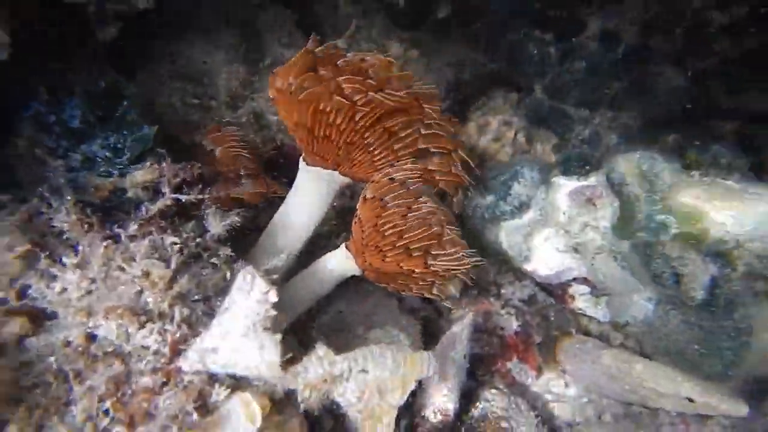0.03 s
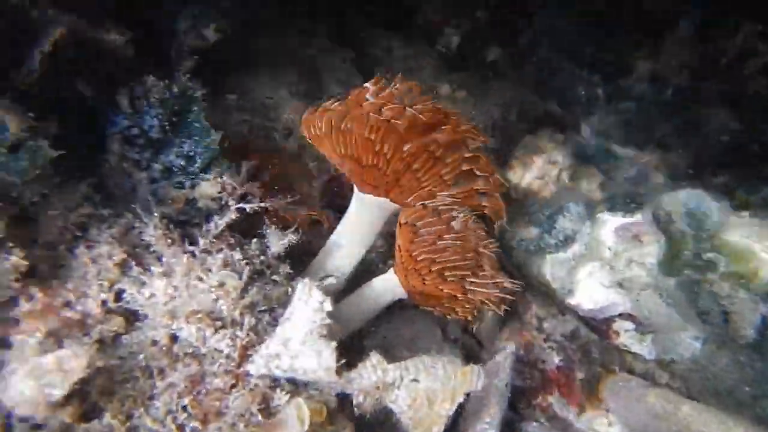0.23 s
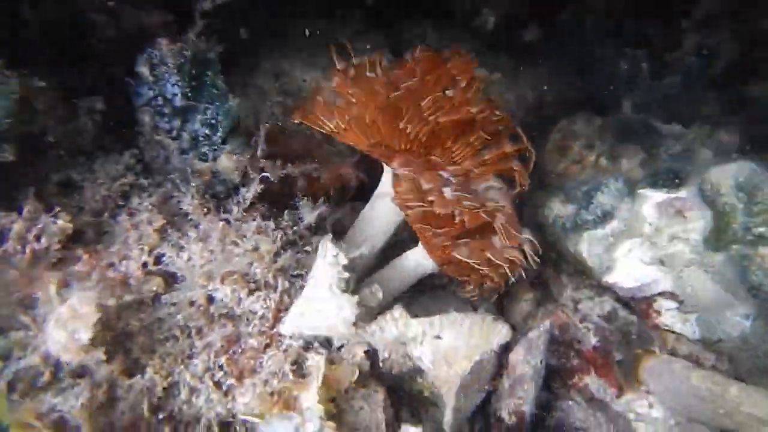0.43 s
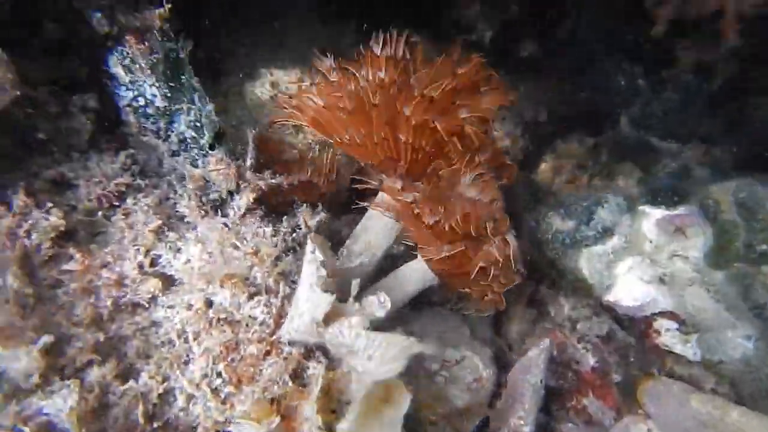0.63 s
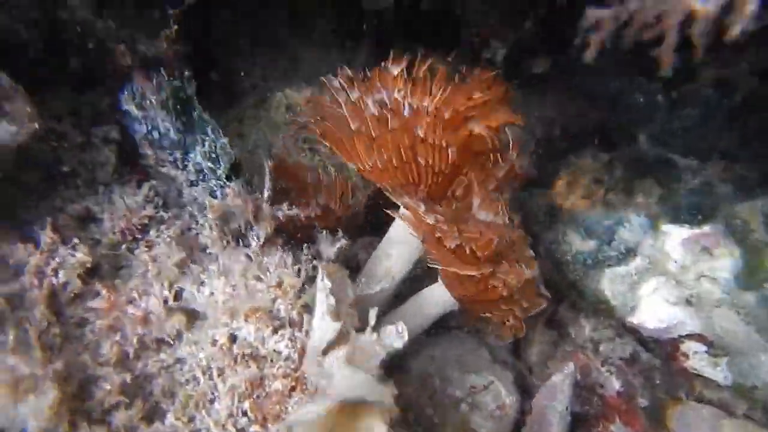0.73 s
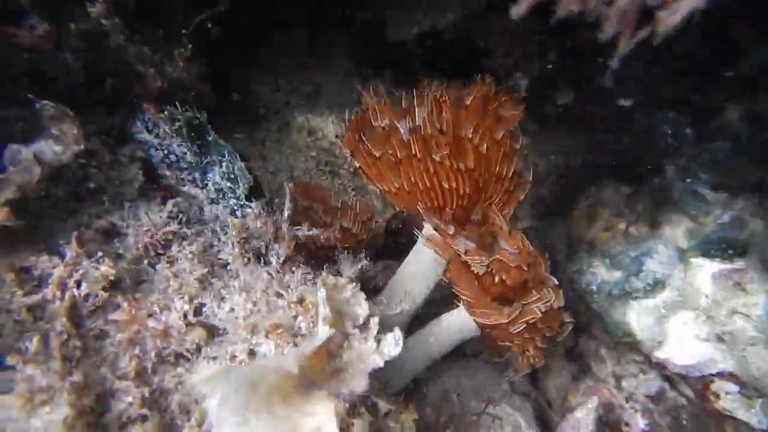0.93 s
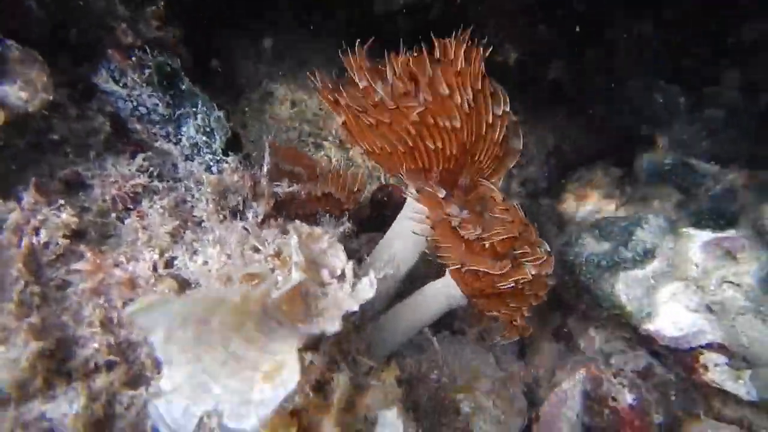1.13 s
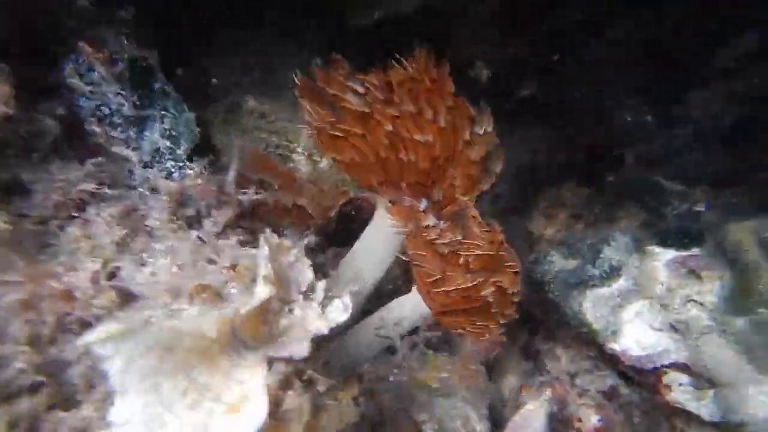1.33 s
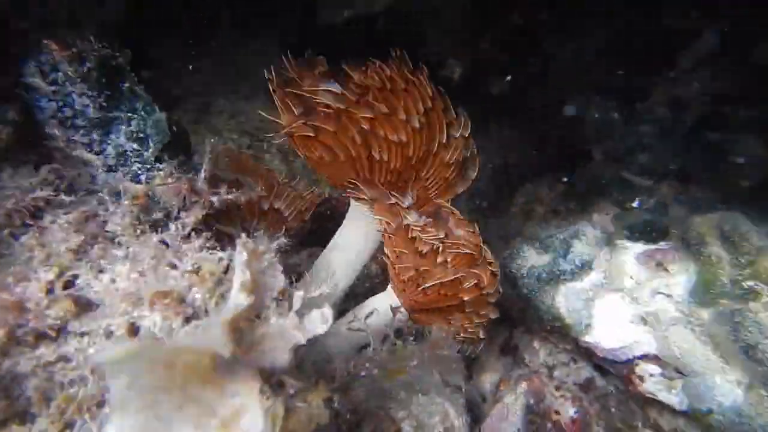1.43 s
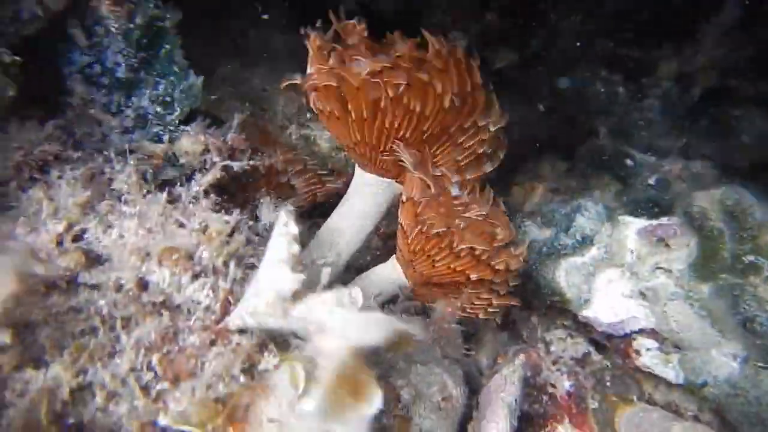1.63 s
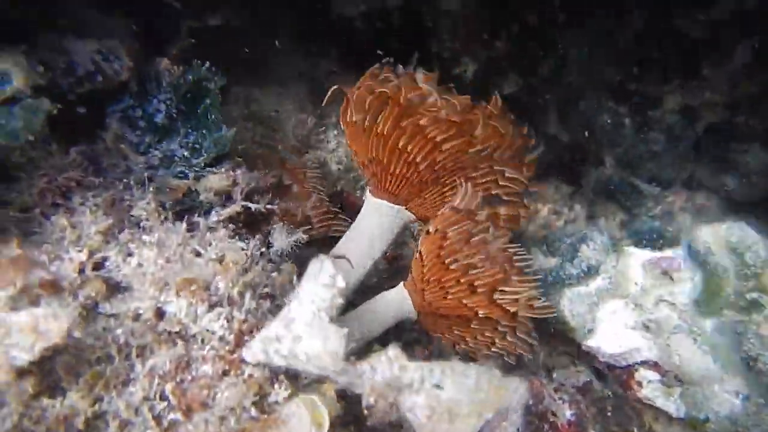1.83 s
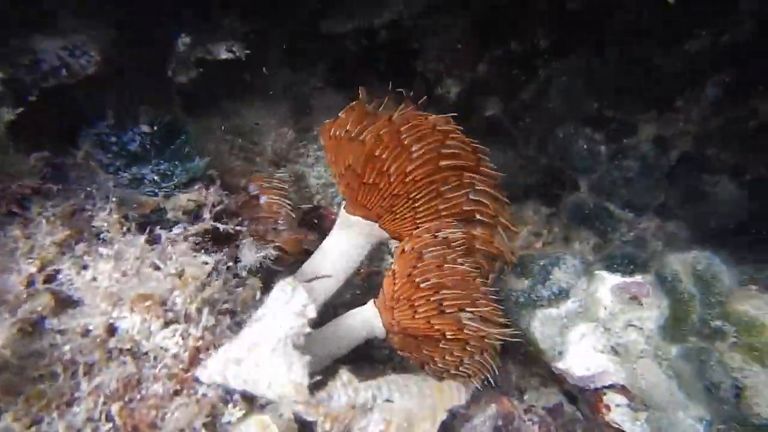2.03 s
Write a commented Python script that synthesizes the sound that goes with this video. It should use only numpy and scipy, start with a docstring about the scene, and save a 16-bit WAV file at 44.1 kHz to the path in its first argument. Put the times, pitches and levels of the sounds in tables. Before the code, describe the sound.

Water surging and gurgling underwater, with scattered sharp knocks and clicks.

```python
"""Underwater among rocks, inside a sealed camera housing. Surging water and countless tiny impacts
shake the housing, which booms near 350 Hz and rings near 1-1.5 kHz under a fizz and a fine hiss.
Slugs of water thump it in low gulps; sharp knocks and thin snaps stand out. Faint, brief tones at
multiples of 1 kHz are heard just after the loudest snaps. After the loudest knocks the rush drops
at once and creeps back."""
import sys
import numpy as np
from scipy import signal
from scipy.fft import rfft, irfft, next_fast_len
from scipy.io import wavfile
from scipy.ndimage import uniform_filter1d, map_coordinates

SR = 44100
rng = np.random.default_rng(int(sys.argv[2]) if len(sys.argv) > 2 else 0)


def log_audio(samples):
    """Write samples as a 16-bit WAV file to the path given in sys.argv[1]."""
    # one column per channel
    frames = np.atleast_2d(samples).T
    # limit to full scale, then quantise
    limited = np.clip(frames, -1, 1)
    pcm = np.round(limited * 32767).astype(np.int16)
    wavfile.write(sys.argv[1], SR, pcm)


N = 92610

# Port likeness: f/Hz, left-right correlation
PORT_LIKENESS = [(40, 0.28), (75, 0.24), (110, 0.75), (170, 0.9), (340, 1), (520, 0.31), (700, 0.092),
                 (1100, 0.37), (1500, 0.75), (2300, 0.9), (3200, 0.99), (4000, 0.25), (6200, 0.25),
                 (10000, 0.12)]
# Port phase: f/Hz, left lag/rad
PORT_LAG_RAD = [(1000, 0), (1600, 1), (2000, 1.48), (3000, 2), (3800, 1.5), (5500, 0.5), (16000, -3.5)]
# Port balance: f/Hz, left minus right/dB
PORT_PAN_DB = [(60, -6), (120, -1), (240, -0.5), (480, -2), (950, 3), (1890, 6.5), (3770, 3.5), (7520, 0),
               (15000, 1)]
# Hiss envelope: t/s, level/dB
HISS_LEVEL_DB = [(0, -78), (.4, -75), (.95, -69), (1.005, -81), (1.65, -71), (1.7, -86), (1.78, -91),
                 (2.1, -90)]
# Hiss spectrum: f/Hz, gain/dB
HISS_EQ = [(3500, -10), (5000, 8), (6500, 8), (9000, 1), (15600, -3), (15900, -25)]
# Surge envelopes: t/s, boom level/dB, ring level/dB, fizz level/dB
SURGE_LEVELS_DB = [(0, -38.5, -34.5, -58.5), (.2, -30.5, -32, -60), (.33, -27, -29.5, -57),
                   (0.411, -23.5, -22.5, -49.5), (0.468, -18.5, -23, -51), (.5, -26, -25, -50),
                   (0.699, -25, -25.5, -52.5), (0.902, -18, -18.5, -45), (0.944, -21.5, -25, -46.5),
                   (0.991, -28.5, -11.5, -47), (1.005, -35, -28, -54.5), (1.08, -29.5, -33, -61.5),
                   (1.2, -29, -32.5, -56.5), (1.33, -21.5, -29.5, -55), (1.521, -22.5, -27, -52.5),
                   (1.632, -20, -21.5, -48), (1.689, -33, -22, -52), (1.698, -38.5, -43.5, -52.5),
                   (1.738, -34, -26, -66), (1.762, -25, -20.5, -56), (1.783, -43, -51, -83),
                   (1.9, -47, -49.5, -75), (2.1, -44, -46, -75.5)]
# Housing responses, low to high: f/Hz, gain/dB
RUMBLE_EQ = [(15, -24), (40, 1), (80, 0), (130, 0), (200, -5.5), (300, -49), (900, -120)]
BOOM_EQ = [(100, -43.5), (160, -16.5), (200, -9), (270, -4.5), (330, 2), (400, 0), (470, -7.5),
           (560, -29.5), (800, -63.5), (2000, -120)]
RING_EQ = [(300, -20.5), (550, -7.5), (800, -5.5), (1000, 1), (1150, -8), (1400, -3.5), (1700, -15.5),
           (2100, -21), (2350, -25.5), (2500, -34.5), (2700, -66), (4000, -120)]
FIZZ_EQ = [(2300, -54.5), (2600, -6), (2900, 5.5), (3150, -1), (3450, -3.5), (4000, -16), (5000, -19),
           (6300, -18.5), (7000, -30), (8300, -27), (9500, -33), (16000, -61)]
# Spectra of faint snaps, loud snaps and knock cracks: f/Hz, gain/dB
TICK_EQ = [(3000, -33), (9000, -14.5), (15600, -13), (16000, -39)]
SNAP_EQ = [(2500, -23.5), (3800, -0.5), (6000, -4.5), (8000, -7.5), (11000, -17.5), (16500, -26.5)]
CRACK_EQ = [(1500, -15), (2100, 21.5), (2500, 4), (3200, 11.5), (3800, -0.5), (4500, -17), (7000, -60)]
# Faint, brief tones: t/s, level/dB
FAINT_TONE_EVENTS = [(.99, -55), (1.686, -56), (1.758, -55.5)]
# Their pitches: multiple of 1 kHz -> gain/dB
FAINT_TONE_GAINS_DB = {5: -8, 6: -1, 7: -1, 8: -4, 9: -8, 11: -18}
# Snaps: t/s, strength/dB, left minus right/dB
SNAP_EVENTS = [(0.2298, -43, 0), (.337, -42, -1.5), (0.423, -40.5, 2.5), (0.5222, -41.5, 0),
               (0.587, -42, -5), (.742, -44, 3), (.898, -33, -9), (0.9306, -23, 2), (0.988, -22.5, -6),
               (0.99, -21, 1.5), (1.138, -44.5, -2), (1.1875, -47.5, -1.5), (1.283, -48, 10.5),
               (1.372, -45.5, -0.5), (1.5, -48, 4.5), (1.5444, -47.5, -1.5), (1.6082, -37.5, 3),
               (1.6532, -29, 0.5), (1.6818, -18, 4), (1.6847, -22, 8), (1.7469, -22, -1),
               (1.7558, -15.5, 2), (1.758, -22, 2)]
# Water slugs: t/s, level/dB, f/Hz, t60/s
GULP_EVENTS = [(0.226, -18.5, 402, 0.054), (0.234, -26, 107, 0.03), (0.292, -21.5, 404, 0.04),
               (0.334, -18, 331, 0.11), (0.367, -4.5, 360, 0.028), (0.383, -5.5, 466, 0.0082),
               (0.398, -13, 340, 0.012), (.411, -12, 342, 0.045), (.436, -13.5, 342, 0.038),
               (.457, -2.5, 395, 0.04), (0.554, -12, 358, 0.031), (0.643, -10, 427, 0.014),
               (0.698, -16, 365, 0.023), (.814, -15.5, 333, 0.035), (0.915, -13.5, 398, 0.025),
               (1.181, -20, 314, 0.065), (1.485, -14.5, 319, 0.082), (1.626, -19.5, 340, 0.067),
               (1.753, -26, 130, 0.017), (1.853, -32.5, 413, 0.11)]
# Knocks: t/s, ping strength/dB, f/Hz, t60/s, crack strength/dB, left minus right/dB
KNOCK_EVENTS = [(.336, -15.5, 1060, 0.015, -51, 8), (0.399, -11, 1539, 0.04, -56, 7),
                (0.424, -11.5, 1116, 0.052, -49, 1), (0.433, -11.5, 1490, 0.031, -58, 5.5),
                (0.472, -10.5, 982, 0.042, -51.5, 14), (.551, -14.5, 1000, .02, -51, 6),
                (0.586, -7, 956, 0.017, -24.5, 7.5), (0.781, -17.5, 1136, 0.037, -52, -2),
                (0.871, -23.5, 960, 0.012, -39, -12), (0.898, -24.5, 1226, .02, -21, 5),
                (0.916, -5.5, 1010, 0.014, -43.5, -1), (.929, -2, 920, 0.012, -22, 3),
                (0.937, -17.5, 1140, 0.022, -54, 13), (0.966, -10, 960, 0.052, -43.5, -3),
                (0.984, -10, 1095, 0.018, -40, -13.5), (0.987, -3.5, 1390, 0.028, -13.5, 5.5),
                (0.9986, -6, 1334, 0.025, -14.5, 3), (1.0623, -13, 1380, 0.017, -47, 1),
                (1.062, -11, 728, 0.047, -65, 2), (1.187, -28, 1250, 0.027, -32, 17.5),
                (1.412, -24, 1560, 0.017, -45, 1), (0.977, -12, 1020, 0.021, -45, -3),
                (1.265, -16, 1054, 0.028, -58, 0), (1.373, -18, 1000, 0.018, -26.5, 2.5),
                (1.574, -5, 1183, 0.02, -26.5, 1.5), (1.597, -11.5, 1020, 0.035, -50, -2.5),
                (1.607, -5.5, 1250, 0.026, -46.5, -2.5), (1.616, -23, 1270, 0.024, -58, -5),
                (1.6519, -2, 1030, 0.018, -16, -1), (1.668, -17.5, 1100, .03, -46.5, -13),
                (1.673, -7.5, 1020, 0.031, -29, -3), (1.682, -4.5, 965, 0.013, -11.5, 1),
                (1.684, -3.5, 1316, 0.019, -15, 4), (1.698, -13, 1370, 0.026, -60, 3),
                (1.7463, -4, 1385, 0.019, -20, 0), (1.7556, -2.5, 1353, 0.0091, -13, 9.5),
                (1.7556, -4.5, 1056, 0.032, -19.5, -0.5), (1.785, -30, 1100, 0.033, -76, -1),
                (1.885, -36.5, 1543, 0.038, -48, 4.5)]

SIDES = np.array([[.5], [-.5]])  # splits a left-right difference
TIME_S = np.arange(N) / SR


def amp(db):
    """dB to amplitude."""
    return 10 ** (np.asarray(db) / 20)


def unit_rms(x):
    """Scale to RMS 1."""
    return x / np.sqrt(np.mean(x ** 2) + 1e-20)


def curve_at(points, hz):
    """Interpolate on a log frequency axis."""
    f, values = np.transpose(points)
    return np.interp(np.log(hz + 1), np.log(f + 1), values)


def wobble(knots_per_s):
    """Smooth random curve."""
    knots = rng.standard_normal(int(N * knots_per_s / SR) + 4)
    return map_coordinates(knots, [TIME_S * knots_per_s])


def filtered(x, response):
    """Apply a complex response(hz)."""
    size = 2 * next_fast_len(N // 2 + SR // 4)
    return irfft(rfft(x, size) * response(np.fft.rfftfreq(size, 1 / SR)), size)[..., :N]


def resonate(x, eq):
    """Minimum-phase filter: rings only after its cause."""
    def response(hz):
        cepstrum = irfft(np.log(amp(curve_at(eq, hz))))
        half = len(cepstrum) // 2
        cepstrum[1:half] *= 2
        cepstrum[half + 1:] = 0
        return np.exp(rfft(cepstrum))
    return filtered(x, response)


def ports(pair):
    """Mix two signals to left and right: partly alike, offset in level and phase."""
    def mid_side(hz):
        angle = np.arccos(np.clip(curve_at(PORT_LIKENESS, hz), 0, 1)) / 2
        return np.array([np.cos(angle), np.sin(angle)])

    def offset(hz):
        return amp(SIDES * curve_at(PORT_PAN_DB, hz)) * np.exp(-1j * SIDES * curve_at(PORT_LAG_RAD, hz))
    mid, side = filtered(pair, mid_side)
    return filtered(np.array([mid + side, mid - side]), offset)


def ping(t, hz, t60_s, rise_s, phase_rad, decay_power=1):
    """Damped mode, peak near 1; decay_power above 1 ends it more abruptly."""
    envelope = amp(-60 * (t / t60_s) ** decay_power) * (1 - np.exp(-t / rise_s)) ** 2
    return envelope / envelope.max() * np.sin(2 * np.pi * hz * t + phase_rad)


def burst(t, t60_s, width):
    """Decaying stereo noise of set energy."""
    noise = rng.standard_normal(len(t)) + width * rng.standard_normal((2, len(t)))
    x = amp(-60 * t / t60_s) * noise
    return 4 * x / np.linalg.norm(x, axis=1, keepdims=True)


def hiss():
    """Fine, smooth hiss that creeps up and drops back."""
    noise = filtered(rng.standard_normal((2, N)), lambda hz: amp(curve_at(HISS_EQ, hz)))
    return amp(np.interp(TIME_S, *np.transpose(HISS_LEVEL_DB))) * unit_rms(noise)


def churn(impacts, impact_share, lump_db, lumps_per_s, patch_db):
    """Churning water: noise plus impacts, swelling in quick lumps and small patches of pitch."""
    mix = np.sqrt(1 - impact_share) * rng.standard_normal((2, N)) + np.sqrt(impact_share) * impacts
    spectra = signal.stft(mix * amp(lump_db * wobble(lumps_per_s)), nperseg=256)[2]
    patches = uniform_filter1d(rng.standard_normal(spectra.shape[1:]), size=4, axis=0)
    patches = unit_rms(uniform_filter1d(patches, size=3, axis=1))
    return signal.istft(spectra * amp(patch_db * patches), nperseg=256)[1][:, :N]


def rush(impacts_per_s=2500, spread_db=5, cap_db=7):
    """Water and tiny impacts shake four bands of the housing; rumble follows boom and ring."""
    chance, polarity, size = rng.random((3, 2, N))
    size_db = np.minimum(-spread_db * np.log(1 - size), cap_db)
    impacts = unit_rms((chance < impacts_per_s / SR) * np.sign(polarity - .5) * amp(size_db))
    times_s, boom_db, ring_db, fizz_db = np.transpose(SURGE_LEVELS_DB)
    rumble_db = -20 + 0.77 * (boom_db + ring_db) / 2

    def band(eq, level_db, **texture):
        shaken = resonate(churn(impacts, **texture), eq)
        return amp(np.interp(TIME_S, times_s, level_db)) * unit_rms(ports(shaken))
    return (band(BOOM_EQ, boom_db, impact_share=0.18, lump_db=0.94, lumps_per_s=45.57, patch_db=0.24)
            + band(RING_EQ, ring_db, impact_share=0.43, lump_db=0.9, lumps_per_s=90, patch_db=0.97)
            + band(FIZZ_EQ, fizz_db, impact_share=0.061, lump_db=2, lumps_per_s=150, patch_db=2.8)
            + band(RUMBLE_EQ, rumble_db, impact_share=0.062, lump_db=1, lumps_per_s=25, patch_db=0.22))


def faint_tones(step_hz=1000, t60_s=0.052):
    """Faint, brief tones at multiples of 1 kHz, heard just after the loudest snaps."""
    out, t = np.zeros((2, N + SR)), np.arange(SR // 10) / SR
    for start_s, db in FAINT_TONE_EVENTS:
        for multiple, gain_db in FAINT_TONE_GAINS_DB.items():
            tone = np.sin(2 * np.pi * multiple * step_hz * t + rng.uniform(0, 2 * np.pi))
            out[:, round(start_s * SR):][:, :len(t)] += amp(db + gain_db - 60 * t / t60_s) * tone
    return out[:, :N]


def snaps(faint_below_db=-37):
    """Bright clicks of a few ms; faint ones are thinner, higher ticks."""
    loud, faint = np.zeros((2, 2, N + SR))
    t = np.arange(SR // 50) / SR
    for start_s, db, pan_db in SNAP_EVENTS:
        bus = faint if db < faint_below_db else loud
        click = amp(db + SIDES * pan_db) * burst(t, t60_s=0.0025, width=0.84)
        bus[:, round(start_s * SR):][:, :len(t)] += click
    return resonate(loud[:, :N], SNAP_EQ) + resonate(faint[:, :N], TICK_EQ)


def gulps(rise_s=0.0043, pan_db=-1.2):
    """Slugs of water thump the housing's lowest resonance, in phase at both ports."""
    out, t = np.zeros(N + SR), np.arange(SR // 5) / SR
    for start_s, db, hz, t60_s in GULP_EVENTS:
        thump = ping(t, hz, t60_s, rise_s, rng.uniform(0, 2 * np.pi), decay_power=1.43)
        out[round((start_s - rise_s / 2) * SR):][:len(t)] += amp(db) * thump
    return out[:N] * amp(SIDES * pan_db)


def knocks(rise_s=0.00019, lag_rad=1.07, wall_hz=2300):
    """Each knock: a two-mode ping dulled by the wall, a 2-3 kHz crack, the housing ringing on."""
    pings, cracks, blows = np.zeros((3, 2, N + SR))
    t, port_rad = np.arange(SR // 10) / SR, -SIDES * lag_rad
    for start_s, db, hz, t60_s, crack_db, pan_db in KNOCK_EVENTS:
        span = slice(round(start_s * SR), round(start_s * SR) + len(t))
        pan = amp(SIDES * pan_db)
        lower = ping(t, hz, t60_s, rise_s, np.pi + port_rad)
        upper = ping(t, 1.275 * hz, 0.61 * t60_s, rise_s, rng.uniform(0, 2 * np.pi) + port_rad)
        pings[:, span] += pan * amp(db) * (lower + amp(-8) * upper)
        cracks[:, span] += pan * amp(crack_db) * burst(t, t60_s=0.0089, width=1)
        blows[:, span] += amp(db + 4.5) * burst(t, t60_s=0.005, width=2.9)
    wall = lambda hz: (1 - (hz / wall_hz) ** 2 + np.sqrt(2) * 1j * hz / wall_hz) ** -2.
    housing = ports(resonate(blows[:, :N], RING_EQ))
    return filtered(pings[:, :N], wall) + resonate(cracks[:, :N], CRACK_EQ) + housing


def scene():
    """Stereo sum of all layers."""
    return rush() + gulps() + knocks() + snaps() + faint_tones() + hiss()


def record(dry):
    """The sealed ports cancel one narrow band; the input rounds off peaks and limits bandwidth."""
    notch_hz, width_hz, notch_gain = 2430, 360, 0.3
    ceiling, hardness = 1.05, 5.9
    top_hz, edge_hz = 16600, 500

    def notch(hz):
        detuning, damping = notch_hz ** 2 - hz ** 2, 1j * hz * width_hz
        return (detuning + notch_gain * damping) / (detuning + damping)
    notched = filtered(dry, notch)
    rounded = notched / (1 + np.abs(notched / ceiling) ** hardness) ** (1 / hardness)
    return filtered(rounded, lambda hz: np.clip((top_hz - hz) / edge_hz, 0, 1))


dry = scene()
out = record(dry)
log_audio(out)
```